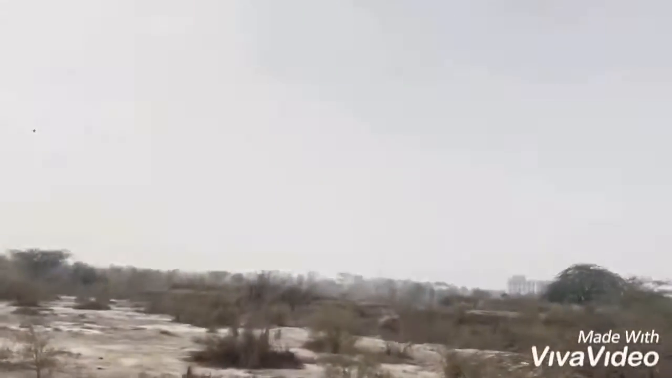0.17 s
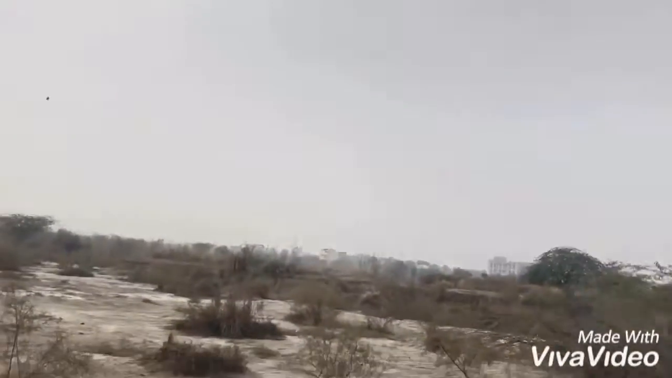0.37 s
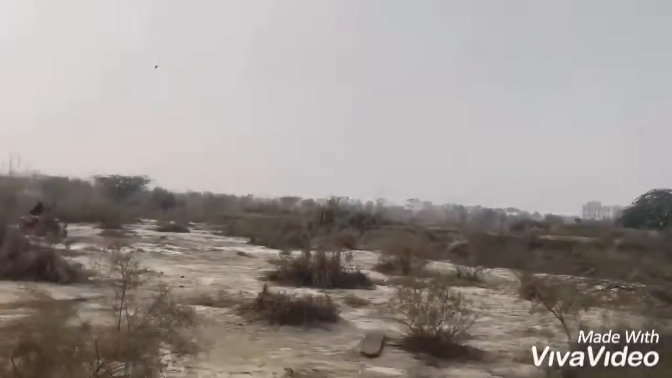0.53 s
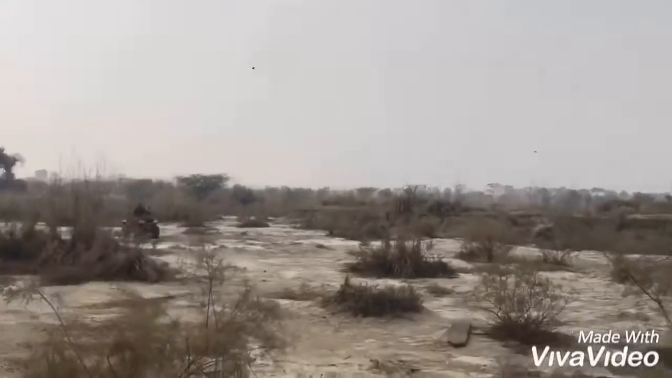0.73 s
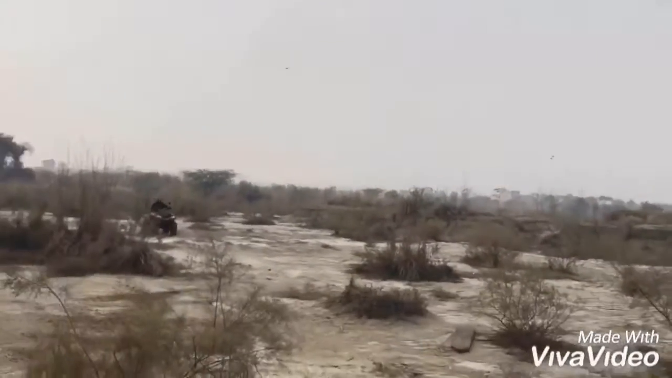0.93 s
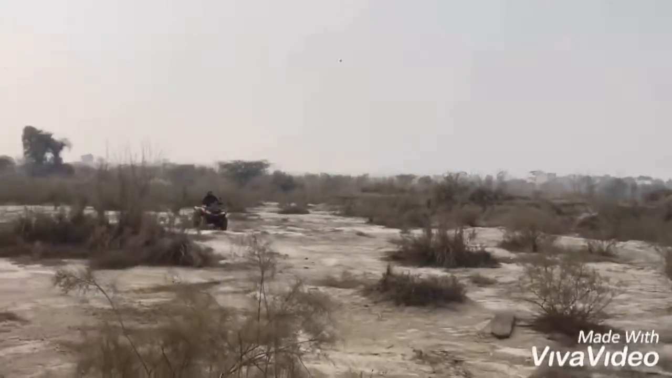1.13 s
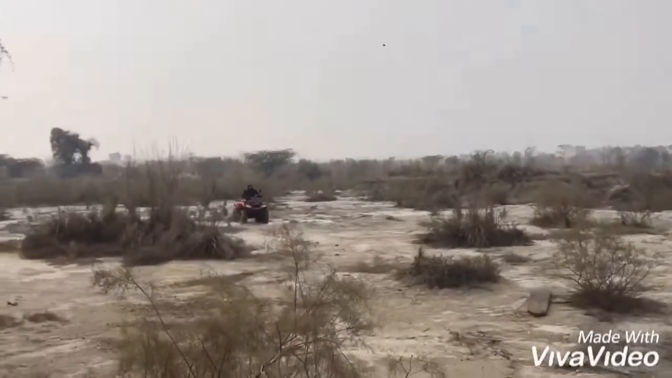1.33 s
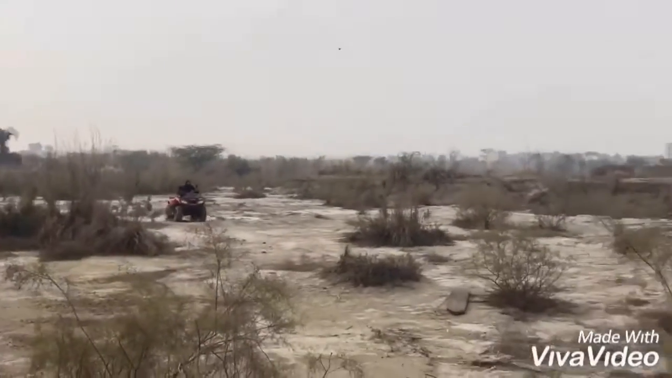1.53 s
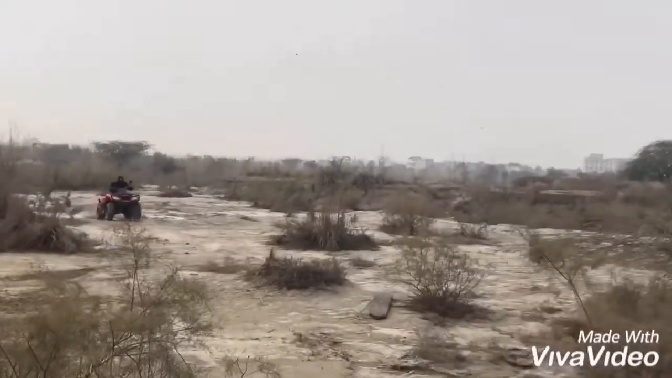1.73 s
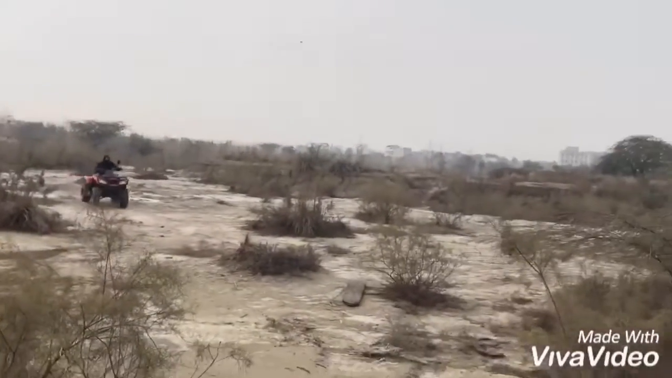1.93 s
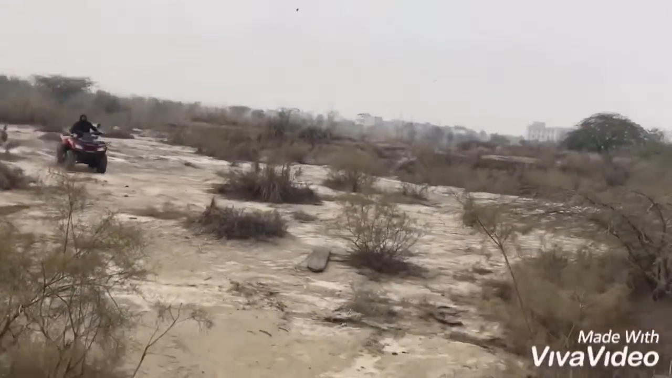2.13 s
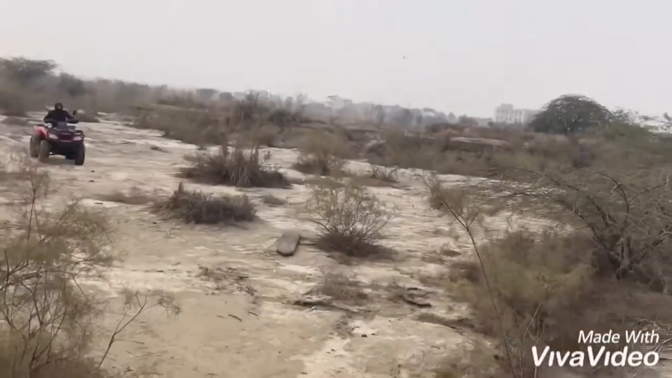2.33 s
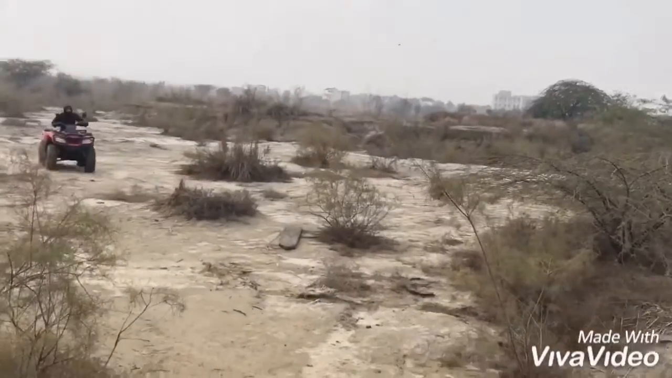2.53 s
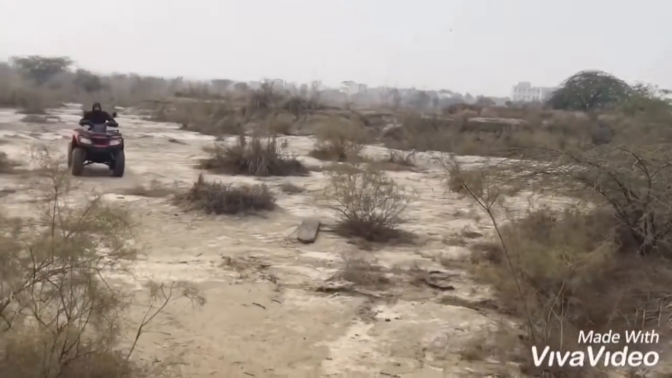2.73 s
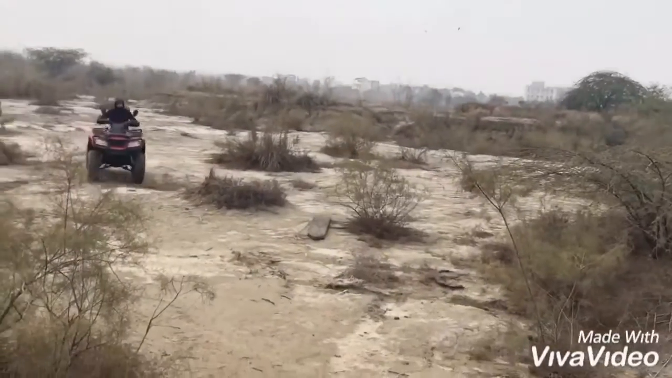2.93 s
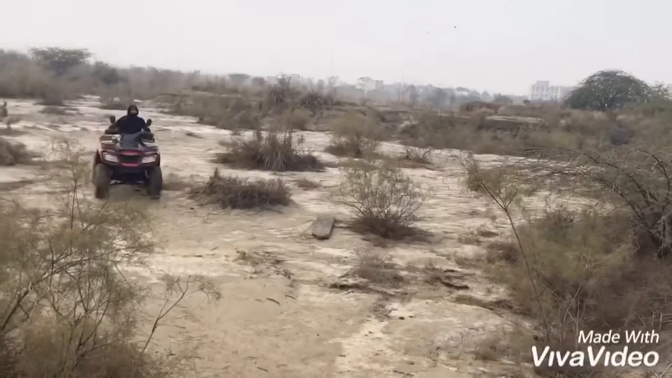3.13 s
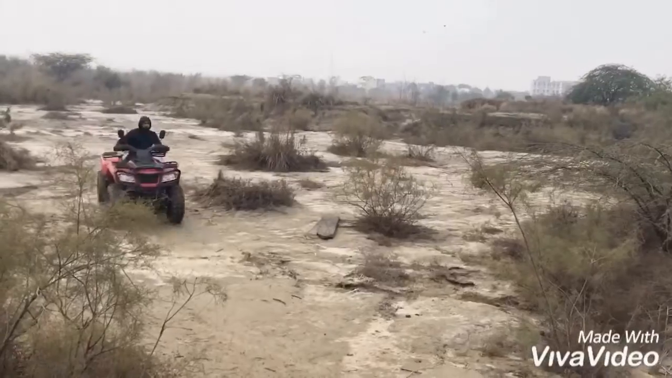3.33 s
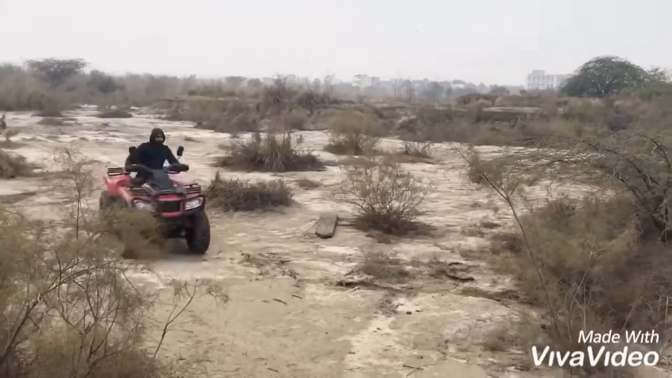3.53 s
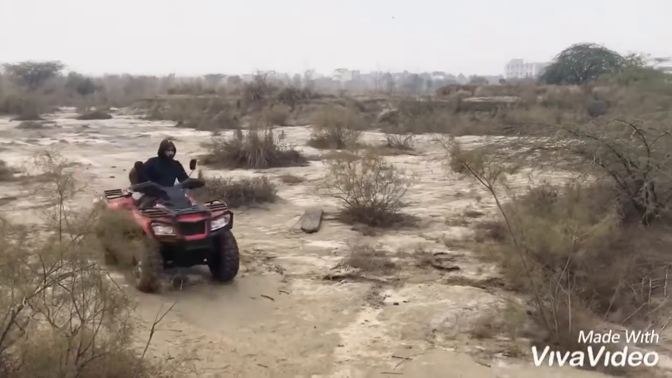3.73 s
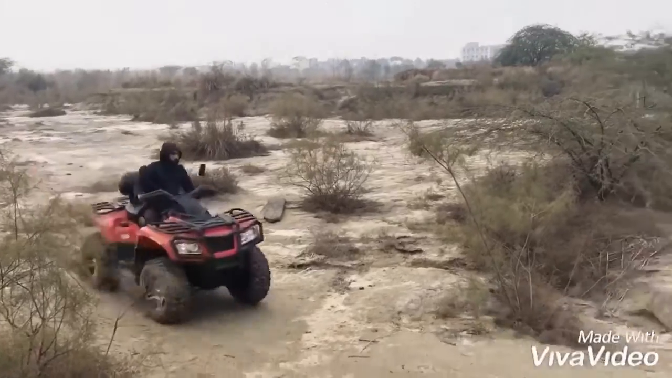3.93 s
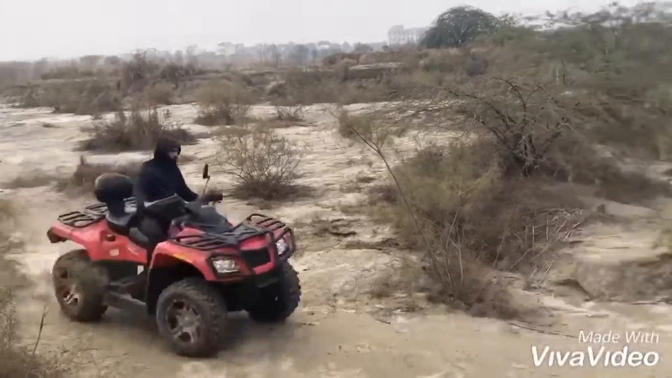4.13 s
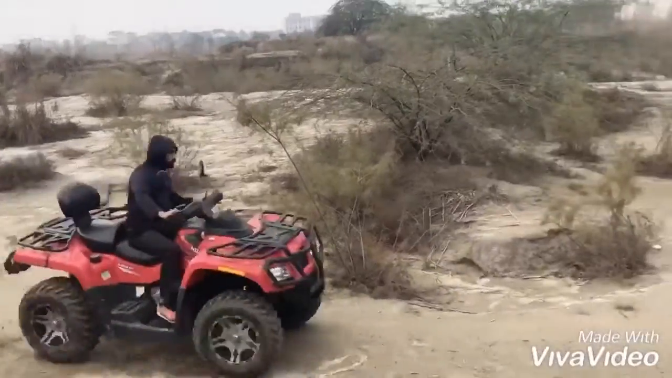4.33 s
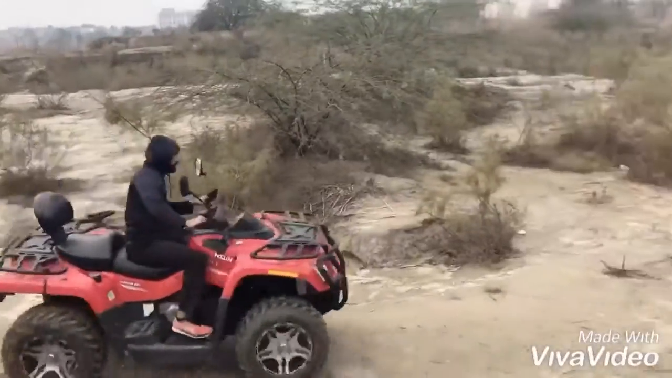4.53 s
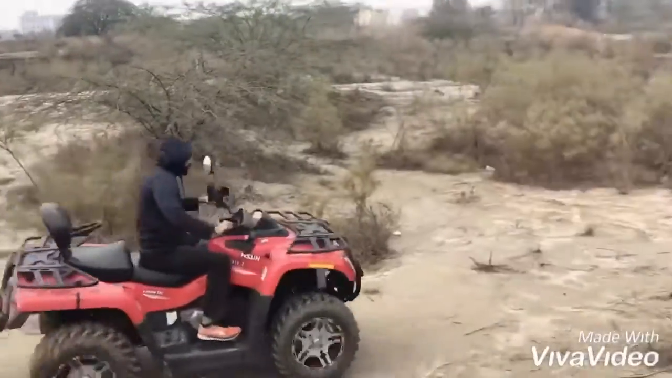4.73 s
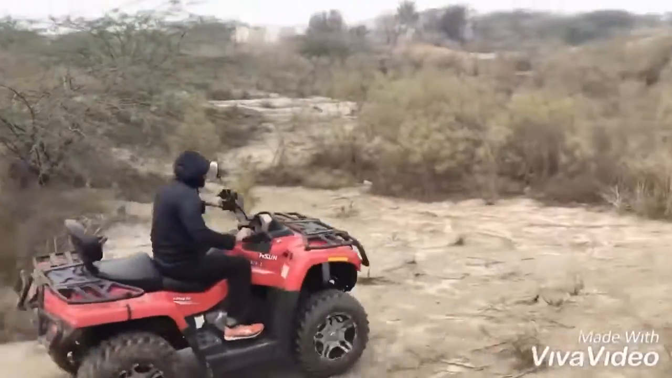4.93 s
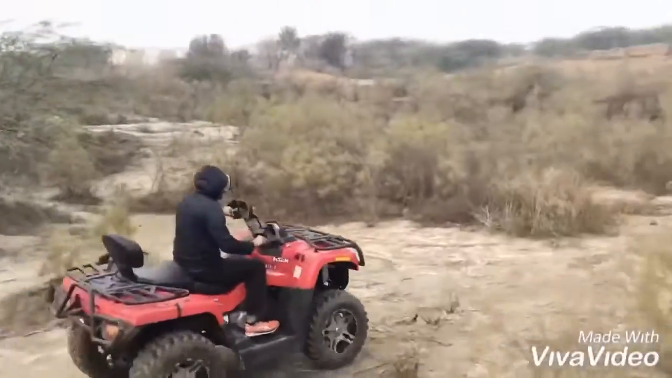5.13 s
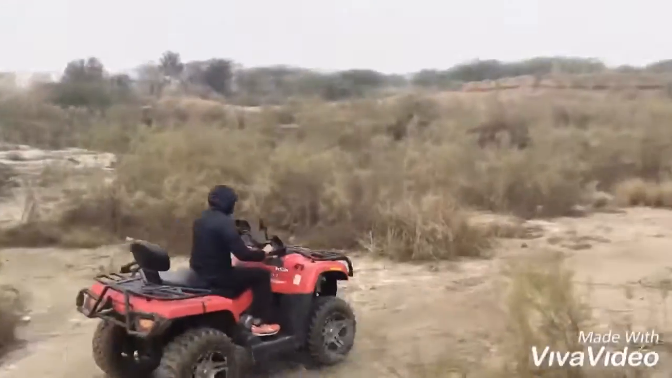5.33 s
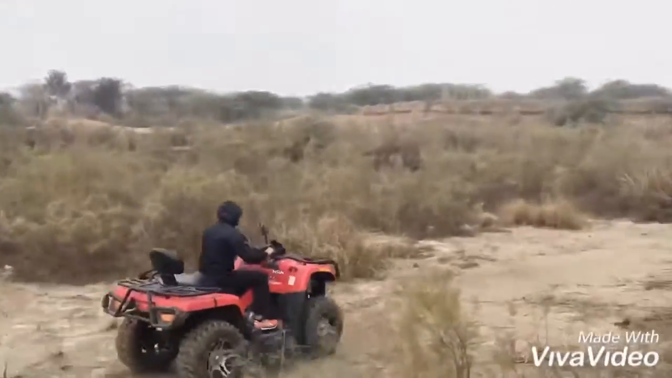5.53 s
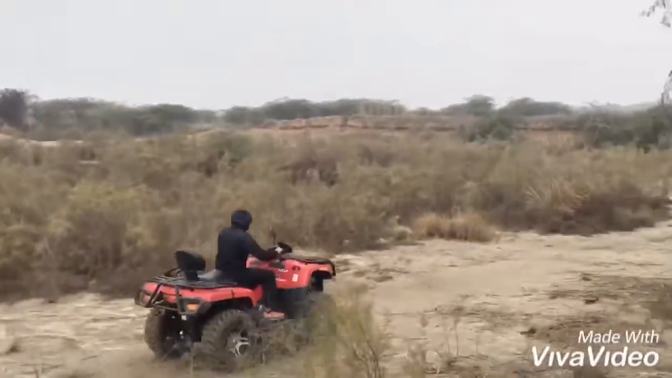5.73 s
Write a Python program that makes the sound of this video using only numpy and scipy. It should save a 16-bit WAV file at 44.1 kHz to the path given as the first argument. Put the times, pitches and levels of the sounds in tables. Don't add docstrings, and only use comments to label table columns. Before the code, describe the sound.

Mono, dry open air with a very faint hiss. From 0 s a distant quad bike holds a quick, low, muffled throb, about fifty beats a second, with dull gear and tyre clatter; a tiny stone clink at 0.4 s. Revs sag around 1.1 s, swell at 1.4-1.7, drop towards 2.2, then climb again to 2.7 as it nears. Faint high, scratchy squeaks flit by, the clearest near 3.9 s. From 2.9 s it coasts down; racks and panels rattle in short clumps around 3.5-3.8 and duller ones to 4.4. Near 4 s it is very close and slow, about twenty beats a second, with uneven hollow booms, strongest 4.2-4.45. It picks up sharply from 4.5; at about 4.75 the sound abruptly opens into a bright, rasping exhaust, each firing spitting hiss. Loudest near 4.85, it revs highest around 5.2, recedes, and eases off just before the end at 5.8 s.

```python
import sys
import numpy as np
from scipy import signal
from scipy.fft import rfft, irfft
from scipy.io import wavfile
from scipy.ndimage import uniform_filter1d

SR = 44100
rng = np.random.default_rng(int(sys.argv[2]) if len(sys.argv) > 2 else 0)


def store_wav(level_fs):
    pcm = np.round(np.clip(np.atleast_2d(level_fs), -1, 1) * 32767)
    wavfile.write(sys.argv[1], SR, pcm.T.astype(np.int16))


def volts_from_decibels(level):
    exponent = np.asarray(level, float) / 20
    return 10 ** exponent


N = 254898

# start_s, target_firings_per_s, throttle_0_1
THROTTLE = [(0.01, 54.5, 0.75), (.21, 49.1, 0.78), (0.632, 49.9, 0.78), (1.06, 38.4, 0), (1.2, 33.8, 0.19),
            (1.42, 42.7, .86), (1.641, 46.7, .7), (1.88, 34.2, 0.13), (2.2, 29.5, .18), (2.33, 36.3, .7),
            (2.48, 42.6, 0.79), (2.65, 48.1, 0.75), (2.91, 34.5, 0.07), (3.162, 31.2, 0.06),
            (3.37, 26.2, 0.06), (3.5, 21.5, 0.12), (3.649, 25, 0.09), (3.8, 23, 0.07), (4.04, 18.6, 0.33),
            (4.309, 22.8, 0.4), (4.42, 31.3, 0.33), (4.73, 36.9, 0.96), (4.82, 43.9, 0.82),
            (4.928, 47.6, 0.9), (5.1, 51.1, 0.69), (5.379, 47.6, 0.6), (5.55, 49, 0.6), (5.689, 39, 0)]
# time_s, closeness_0_1, tail_pipe_facing_0_1, hidden_by_bodywork_0_1
PLACE = [
    (0, 0, 0, 1),
    (1.9, 0, 0, 1),
    (2.5, 1, 0, 1),
    (4.1, 1, 0, 1),
    (4.5, 1, 0, .75),
    (4.72, 1, .15, .6),
    (4.78, 1, 1, .25),
    (4.9, 1, 1, 0),
    (5.78, 1, 1, 0),
]
# time_s, distance_m
DISTANCE = [(0, 48), (.4, 26), (1.0, 14.2), (1.7, 11.5), (2.2, 12.2), (2.7, 11), (3.3, 6.8), (4.0, 2.83),
            (4.6, 2.95), (5.0, 6.04), (5.4, 7.96), (5.78, 8.3)]
# time_s, level_db
NOTE_LEVEL = [(0.0, -20), (1.0, -20.5), (2.0, -18.5), (2.5, -16), (3.0, -15), (3.6, -16), (3.9, -14.5),
              (4.2, -14), (4.45, -10), (4.7, -11.5), (4.85, -8), (5.1, -12), (5.3, -15), (5.78, -14.5)]
# order, exhaust_db, intake_db, angle_rad
FRONT_ORDERS = [(1.0, -10, -14.5, 0.5), (2.0, 0.26, -6, 1), (3.0, -4, -2.5, 3), (4.0, -14.5, -11, 2),
                (5.0, -21.5, -31.5, 0.0), (6.0, -24, -21.5, 1)]
# order, wide_open_db, shut_db
REAR_ORDERS = [(1.0, -4, 9.5), (2.0, -0.5, -18), (3.0, -4, -6), (4.0, -6, -8.5), (5.0, -38, 9.5),
               (6.0, -27, -3)]
# order, front_db, rear_db
OVERTONES = [(7, -5, -5), (8, -23, -9.5), (9, -6.5, -4), (10, -25.5, -8), (11, -13.5, -17.5),
             (12, -12.5, -1.5), (13, -17, -6), (14, -11, -1.5), (15, -23.5, -12.5), (16, -21.5, -9.5),
             (17, -19.5, -17), (18, -19.5, -7.5)]
# centre_hz, width_hz, gain_db
AIR_BOX = [(116, 50.5, 17.5)]
# freq_hz, density_db_per_hz
FAR_COLOUR = [(250, -11), (420, -10), (473, -7), (601, -6.5), (677, -9.5), (919, -5), (1050, -3),
              (1250, -1), (1520, -18.5), (3800, -46), (5960, -51.5), (10000, -67), (13000, -84),
              (22000, -120)]
# freq_hz, density_db_per_hz
FRONT_COLOUR = [(190, -35), (330, 4.5), (458, -3.5), (601, 9), (788, -7.5), (1000, -6), (1750, -13.5),
                (2140, -22), (2430, -25.5), (5040, -45), (5980, -44.5), (10000, -58), (13000, -81.5),
                (22000, -120)]
# freq_hz, density_db_per_hz
REAR_COLOUR = [(190, -39), (330, -0.5), (458, 0), (521, -6.5), (592, -0.5), (859, -5), (1520, -3),
               (1680, -8), (2050, -12.5), (2850, -27), (3190, -26), (10000, -47.5), (13000, -73),
               (22000, -120)]
# centre_hz, width_hz, level_db
CASING = [(605, 50, -9), (1380, 180, -15), (2800, 200, -28), (4500, 300, -36)]
# time_s, extra_path_ms, share_0_1
GROUND = [(0, .34, .9), (1.0, .34, .9), (1.5, .41, .8), (2.3, .46, .2), (5.78, .9, 0)]
# freq_hz, density_db_per_hz
AIR_COLOUR = [(1180, -35), (2000, -12.5), (2440, 2), (2610, -7), (4450, -16), (4930, -25), (5960, -31.5),
              (15600, -30)]
# start_s, level_db, pitch_hz
CLINK = [
    (.408, -46, 1900),
    (.414, -53, 2400),
    (.426, -51, 1680),
]
# peak_s, level_db, rise_s, fall_s
SQUEAK = [
    (1.02, -72, .015, 0.067),
    (1.6, -76, 0.028, 0.46),
    (1.93, -68, 0.018, .035),
    (2.08, -80, .05, 0.024),
    (2.56, -75.5, .08, .13),
    (2.76, -70.5, .04, 0.08),
    (3.049, -78, 0.13, 0.18),
    (3.63, -71.5, 0.27, 0.061),
    (3.88, -62.5, 0.04, 0.051),
]
# start_s, peak_db, dull_700_1500_hz_re_peak_db, length_s
RATTLES = [(1.937, -40, -21, 0.028), (2.163, -44, -1, 0.02), (2.289, -45, 9, 0.014),
           (3.492, -35, -2.5, .02), (3.565, -33, -2.5, 0.021), (3.619, -32.5, -0.5, 0.065),
           (3.716, -43, 10, 0.022), (3.812, -32.5, 3.5, 0.015), (3.934, -49, 20, 0.021),
           (4.06, -40.5, 11, 0.018), (4.104, -40.5, 8.5, 0.061), (4.153, -40.5, 10, 0.019),
           (4.192, -51, 16.5, 0.093), (4.291, -39.5, 15.5, 0.02), (4.445, -41, 4, 0.014)]
# start_s, peak_db, pitch_hz
LUMPS = [
    (3.711, -16, 136.7),
    (3.751, -16, 137.4),
    (4.049, -17, 128),
    (4.092, -15, 122.4),
    (4.236, -8.5, 113.3),
    (4.336, -9.5, 102.6),
    (4.381, -9.5, 120),
    (4.432, -7, 117.4),
    (4.473, -10.5, 136),
    (4.505, -13, 142.7),
]
# freq_hz, density_db_per_hz
JET_COLOUR = [(2940, -25.5), (5000, -6.5), (6280, -1), (7820, -17), (9330, -1.5), (10300, -5), (11600, 1.5),
              (15600, -5)]

AIR_DB = -75
START_PER_S, LAG_S = 50.3, .042
FIRING_S = 4.9075
GEAR_DB, GEAR_DB_PER_OCTAVE, GEAR_OPEN_DB = -23.5, 7, 4
MID_DB, MID_REAR_DB, MID_DB_PER_M = -5, 2.5, 0.1759
HIGH_DB, HIGH_REAR_DB, HIGH_DB_PER_M = -14, 5.5, 0.1969
JET_DB, JET_REAR_DB, JET_OPEN_DB, JET_DB_PER_M = -28.5, 9, -1.5, -0.92
SQUEAK_HZ, SQUEAK_SAG_HZ, SAG_FROM_S, SAG_S = 5910, 100, 3.7, 0.37
SILENCER_CUT_HZ, PIPE_CUT_HZ = 61.2, 46.2
HONK_HZ, HONK_WIDTH_HZ, HONK_DB = 212, 30, 13
LURCH_DB = 9
UNEVEN_DB, UNEVEN_PER_S = .5, 6
REAR_RASP_DB = 3
QUICK_PER_S2, CRUISE_OPENING = 45, .5
SIDE_HZ, SIDE_WIDTH_HZ, SIDE_DB, SIDE_BASS_DB = 168.5, 41, 10, -6


def rms_one(x):
    return x / np.sqrt(np.mean(x ** 2) + 1e-20)


def in_time(rows):
    time_s, *columns = np.transpose(rows)
    return [np.interp(np.arange(N) / SR, time_s, c) for c in columns]


def drift(rate_per_s):
    r = np.exp(-80 * np.pi * rate_per_s / SR)
    noise = rng.standard_normal(N // 40 + 2002)
    slow = signal.lfilter([1], [1, -2 * r, r * r], noise)[2000:]
    return np.interp(np.arange(N) / 40, np.arange(len(slow)), rms_one(slow))


def coloured(x, spectrum, low_hz=20, high_hz=20000):
    hz = np.maximum(np.arange(N // 2 + 1) * SR / N, 1)
    points = np.array(spectrum)
    gain = volts_from_decibels(np.interp(np.log(hz), np.log(points[:, 0]), points[:, 1]))
    gain = gain / np.sqrt((1 + (low_hz / hz) ** 8) * (1 + (hz / high_hz) ** 8))
    return rms_one(irfft(rfft(x) * gain, N))


def resonance(x, hz, width_hz):
    r = np.exp(-np.pi * width_hz / SR)
    numerator = np.array([1, 0, -1]) * (1 - r * r) / 2
    return signal.lfilter(numerator, [1, -2 * r * np.cos(2 * np.pi * hz / SR), r * r], x)


def panel_ring(x, hz, width_hz):
    return rms_one(resonance(resonance(x, hz, width_hz), hz, width_hz))


def puffs(cycles, decay_s, rate, spread_db, at=0.):
    shifted = cycles - at + 1
    per_firing = volts_from_decibels(spread_db * np.clip(rng.standard_normal(400), -1.6, 1.6))
    since_s = shifted % 1 / rate
    attack = 1 - np.exp(-since_s / .0004)
    return per_firing[shifted.astype(int)] * np.exp(-since_s / decay_s) * attack


def follow(column, start):
    step = np.arange(0, N + 32, 32)
    since = np.maximum(step[:, None] / SR - np.array(THROTTLE)[:, 0], 0) / LAG_S
    smooth = start + (1 - (1 + since) * np.exp(-since)) @ np.diff(column, prepend=start)
    return np.interp(np.arange(N), step, smooth)


def orders(rate, opening, facing, hidden):
    note_db, = in_time(NOTE_LEVEL)
    closing = np.maximum(-np.gradient(opening), 0) * SR * LAG_S * np.e
    rising = np.tanh(np.maximum(np.gradient(rate), 0) * SR / QUICK_PER_S2) * (1 - facing)
    pull = np.clip(opening, CRUISE_OPENING + hidden / 2, 1)
    side = 4 * hidden * (1 - hidden) * (1 - facing)
    out = []
    for (k, exhaust_db, intake_db, angle_rad), (_, open_db, shut_db) in zip(FRONT_ORDERS, REAR_ORDERS):
        hz = k * rate
        intake = (1 - opening) * volts_from_decibels(intake_db) * np.exp(1j * angle_rad)
        front = np.abs(opening * volts_from_decibels(exhaust_db) + intake)
        rear = volts_from_decibels(pull * open_db + (1 - pull) * shut_db)
        level = (1 - facing) * front + facing * rear
        box_db = sum(db * np.exp(-((hz - top) / width) ** 2) for top, width, db in AIR_BOX) * (k > 4.5)
        honk_db = rising * HONK_DB * np.exp(-((hz - HONK_HZ) / HONK_WIDTH_HZ) ** 2) * (k > 5.5)
        lurch_db = closing * LURCH_DB * (k < 1.5)
        side_ring_db = SIDE_DB * np.exp(-((hz - SIDE_HZ) / SIDE_WIDTH_HZ) ** 2)
        side_db = side * (side_ring_db + SIDE_BASS_DB * (k < 2.5))
        cut = (1 + (SILENCER_CUT_HZ / hz) ** 4) * (1 + (PIPE_CUT_HZ / hz) ** 10)
        uneven_db = UNEVEN_DB * (1 + abs(k - 2.5)) * drift(UNEVEN_PER_S)
        shift_db = box_db + honk_db + lurch_db + side_db + uneven_db
        out.append(note_db + shift_db + 10 * np.log10((level ** 2 + 1e-8) / cut))
    return out


def thump(cycles, rate, orders_db, clatter_db, facing, hidden):
    steady = np.clip((rate - 24) / 7, .35, 1)
    levels = [volts_from_decibels(db) * (steady if k > 3 else 1) for k, db in enumerate(orders_db)]
    box = np.hypot(levels[4], levels[5])
    load = uniform_filter1d(np.tanh((orders_db[1] - orders_db[2]) / 3), SR // 12)
    side_loss = volts_from_decibels(-24 * hidden * (1 - hidden))
    for order, front_db, rear_db in OVERTONES:
        box_tail = box * volts_from_decibels(-4.5 * (order - 6)) / np.hypot(1, (order * rate / 235) ** 8) * side_loss
        view_db = front_db + facing * (rear_db + REAR_RASP_DB * load - front_db)
        levels.append(np.hypot(box_tail, volts_from_decibels(clatter_db + view_db) * steady))
    pipe_lag = np.clip(.04 * (rate - 44), -.3, .35)
    out = np.zeros(N)
    for k, level in enumerate(levels, 1):
        wobble = volts_from_decibels((.3 * np.sqrt(k) + .25 * max(k - 4, 0) * hidden) * drift(12))
        smear = .15 * (min(k, 5) - 2.5) ** 2 * hidden * load - .45 * facing * (k == 1)
        phase = 2 * np.pi * (k * cycles - pipe_lag - smear) + .025 * k * drift(9)
        out += np.sqrt(2) * level * wobble * np.cos(phase)
    churn_colour = [(30, -14), (60, -30.5), (120, 8), (220, 16.0), (330, -10.5)]
    churn = coloured(rng.standard_normal(N), churn_colour, 35, 400)
    ragged = rng.standard_normal(N) * (.4 + puffs(cycles, .015, rate, 2))
    sputter = coloured(ragged, [(60, -14), (140, 0), (220, -1), (290, -5), (380, -18)], 80, 330)
    loud = np.sqrt(levels[1] ** 2 + levels[2] ** 2 + levels[3] ** 2)
    out += churn * loud * volts_from_decibels(-21)
    return out + sputter * np.hypot(loud, 2 * box) * (1 - steady) * volts_from_decibels(-7)


def clatter(cycles, rate, low_db, mid_db, high_db, near, facing):
    knock = puffs(cycles, .006, rate, 2.5, at=-.1) + .4 * puffs(cycles, .004, rate, 3.0, at=.35)
    knock = knock * (.7 + 2.4 * facing)
    shared = drift(11.0)
    out = np.zeros(N)
    bands = [(338, 890, 0, 9.3), (860, 8200, mid_db, 1.8), (2460, 18000, high_db, 1.2)]
    for low_hz, high_hz, band_db, even in bands:
        noise = rng.standard_normal(N) * (even + knock)
        views = (FAR_COLOUR, FRONT_COLOUR, REAR_COLOUR)
        far, front, rear = [coloured(noise, view, low_hz, high_hz) for view in views]
        seen = (1 - near) * far + near * ((1 - facing) * front + facing * rear)
        out += seen * volts_from_decibels(band_db + .8 * drift(10) + .5 * shared)
    drive = rng.standard_normal(N) * (0.25 + knock)
    for hz, width_hz, level_db in CASING:
        out += volts_from_decibels(level_db + 2.1 * drift(0.93)) * panel_ring(drive, hz, width_hz)
    return volts_from_decibels(low_db) * out


def bark(cycles, rate, level_db, facing):
    out = np.zeros(N)
    for hz in np.geomspace(750, 3000, 11):
        burst = rng.standard_normal(N) * puffs(cycles, .004, rate, 6.0, at=-.1)
        out += volts_from_decibels(-7.0 * np.log2(hz / 1000)) * panel_ring(burst, hz, 90 + 0.1 * hz)
    return volts_from_decibels(level_db - 11 + 11 * facing) * rms_one(out)


def over_sand(x):
    extra_ms, share = in_time(GROUND)
    dull = signal.sosfilt(signal.butter(2, 2000, fs=SR, output="sos"), x)
    bounce = np.interp(np.arange(N) - extra_ms * SR / 1000, np.arange(N), dull)
    return (x + share * bounce) / np.sqrt(1 + share ** 2)


def open_air():
    return volts_from_decibels(AIR_DB) * coloured(rng.standard_normal(N), AIR_COLOUR, 4500)


def clink():
    out, t = np.zeros(N), np.arange(round(.06 * SR)) / SR
    shape = t / 0.011 * np.exp(1 - t / 0.0079)
    for start_s, level_db, hz in CLINK:
        i = round(start_s * SR)
        out[i:i + len(t)] += volts_from_decibels(level_db) * shape * np.sin(2 * np.pi * hz * t)
    return out


def squeak():
    t = np.arange(N) / SR
    level = np.zeros(N)
    for peak_s, level_db, rise_s, fall_s in SQUEAK:
        away = np.where(t < peak_s, (peak_s - t) / rise_s, (t - peak_s) / fall_s)
        level += volts_from_decibels(level_db) * np.exp(-away)
    hz = SQUEAK_HZ - SQUEAK_SAG_HZ * np.clip((t - SAG_FROM_S) / SAG_S, 0, 1)
    phase = 2 * np.pi * np.cumsum(hz + 40 * drift(60)) / SR
    tone = drift(50) * np.sin(phase)
    tone += volts_from_decibels(-7) * drift(50) * np.sin(1.024 * phase)
    tone += volts_from_decibels(-8) * drift(50) * np.sin(1.082 * phase)
    fits = np.clip((20 * np.log10(level + 1e-9) + 84.5) / 10, 0, 1)
    return level * volts_from_decibels(4.5 + 2.3 * drift(20)) * fits * tone


def rattles():
    ticks = rng.standard_normal((2, N)) * volts_from_decibels(3 * np.minimum(rng.exponential(1, (2, N)), 4))
    thin_colour = [(1200, 27.5), (2500, -0.5), (4000, -10.0), (6500, -18), (10000, -31), (15000, -41.5)]
    thin = coloured(ticks[0], thin_colour, 2200)
    dull = coloured(ticks[1], [(500, -4), (750, -2.0), (1100, -9.5), (1800, -23.5)], 550, 2700)
    thin_gain, dull_gain = np.zeros(N), np.zeros(N)
    t = np.arange(round(.12 * SR)) / SR
    for start_s, peak_db, dull_db, length_s in RATTLES:
        i = round(start_s * SR)
        shape = (1 - np.exp(-t / .002)) * np.exp(-(t / length_s) ** 1.5)
        thin_gain[i:i + len(t)] += volts_from_decibels(peak_db - 7) * shape
        dull_gain[i:i + len(t)] += volts_from_decibels(peak_db - 3 + dull_db) * shape
    return thin * thin_gain + dull * dull_gain


def lumps():
    out, t = np.zeros(N), np.arange(round(.07 * SR)) / SR
    shape = t / .011 * np.exp(1 - t / .011)
    for start_s, peak_db, hz in LUMPS:
        i = round(start_s * SR)
        out[i:i + len(t)] += volts_from_decibels(peak_db) * shape * np.sin(2 * np.pi * hz * t * (1 - 1.0 * t))
    return out


def jet(cycles, rate, level_db, facing):
    spit = puffs(cycles, .0025, rate, 3, at=-.1)
    spit = spit + .55 * puffs(cycles - .008 * rate, .003, rate, 4, at=-.1)
    gate = .16 * rate / 45 + facing * spit
    return volts_from_decibels(level_db + 12.5) * gate * coloured(rng.standard_normal(N), JET_COLOUR, 5100)


def scene():
    _, target_per_s, thumb = np.transpose(THROTTLE)
    rate, opening = follow(target_per_s, START_PER_S), follow(thumb, thumb[0])
    near, facing, hidden = in_time(PLACE)
    metres, = in_time(DISTANCE)
    low_db = GEAR_DB - 20 * np.log10(metres) + GEAR_DB_PER_OCTAVE * np.log2(rate / 40) + GEAR_OPEN_DB * opening
    mid_db = MID_DB + MID_REAR_DB * facing + MID_DB_PER_M * metres
    high_db = HIGH_DB + HIGH_REAR_DB * facing + HIGH_DB_PER_M * metres
    jet_db = low_db + JET_DB + JET_REAR_DB * facing + JET_OPEN_DB * (opening - 1) + JET_DB_PER_M * metres
    cycles = np.cumsum(rate) / SR
    cycles = cycles + 1 - cycles[round(FIRING_S * SR)] % 1
    engine = thump(cycles, rate, orders(rate, opening, facing, hidden), low_db, facing, hidden)
    gear = clatter(cycles, rate, low_db, mid_db, high_db, near, facing)
    gear = gear + bark(cycles, rate, low_db + mid_db, facing)
    mix = engine + over_sand(gear) + open_air() + clink() + squeak() + rattles() + lumps()
    return (mix + jet(cycles, rate, jet_db, facing))[None]


def roll_off(x):
    return signal.sosfilt(signal.butter(12, 15740, fs=SR, output="sos"), x)


def record(dry):
    to_edge = np.minimum(np.arange(N), N - np.arange(N))
    fade = np.minimum(to_edge / (.004 * SR), 1)
    return roll_off(np.clip(dry * fade, -.98, .98))


dry = scene()
out = record(dry)
store_wav(out)
```